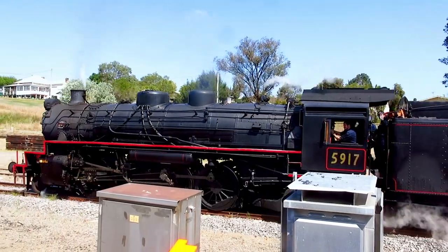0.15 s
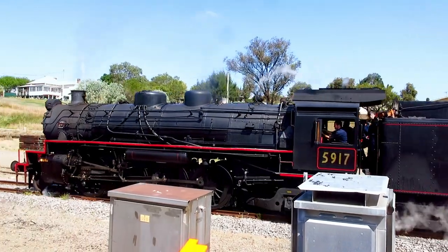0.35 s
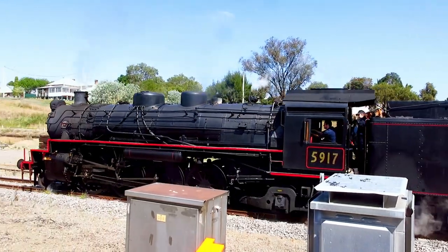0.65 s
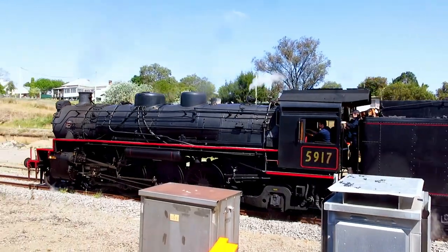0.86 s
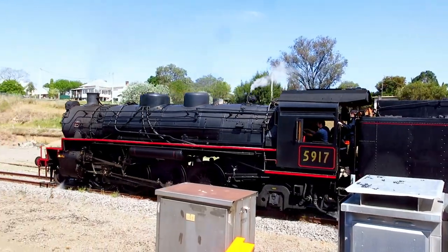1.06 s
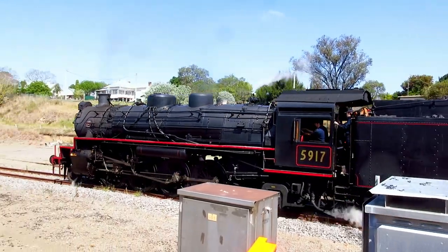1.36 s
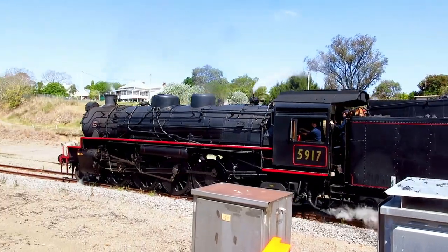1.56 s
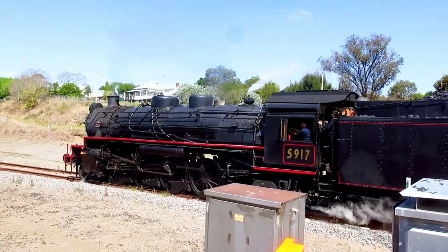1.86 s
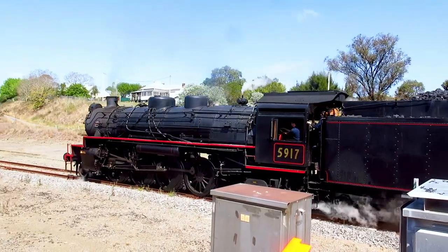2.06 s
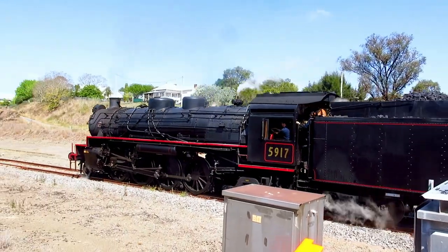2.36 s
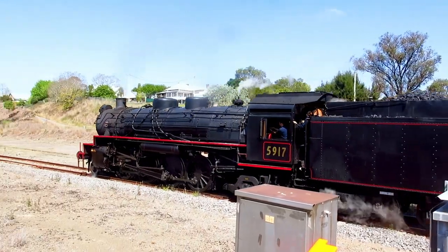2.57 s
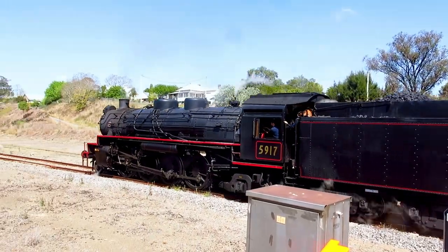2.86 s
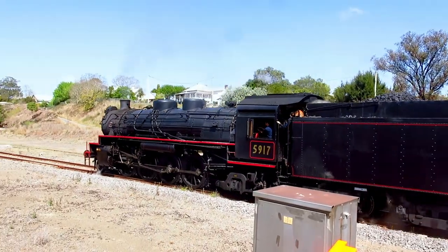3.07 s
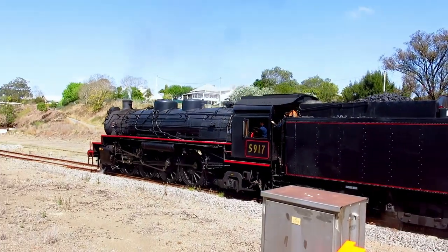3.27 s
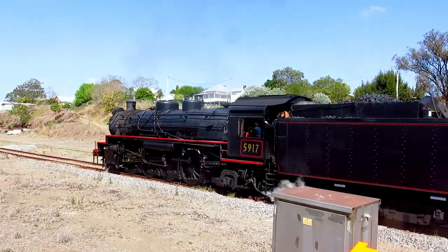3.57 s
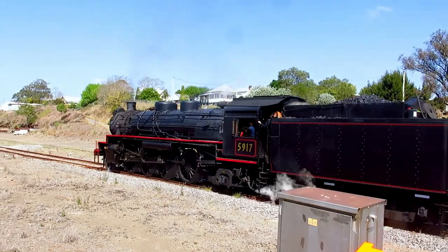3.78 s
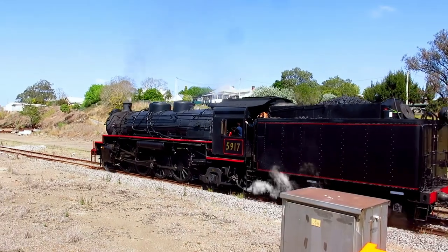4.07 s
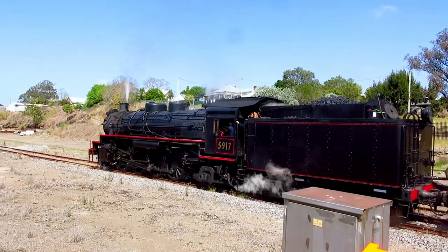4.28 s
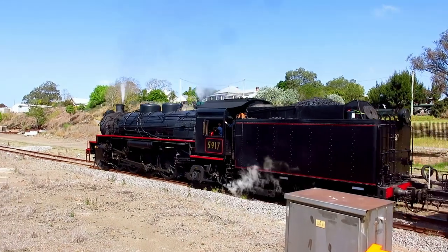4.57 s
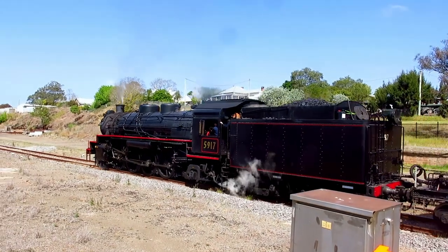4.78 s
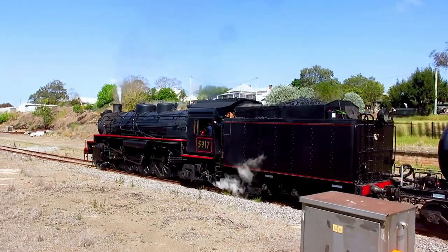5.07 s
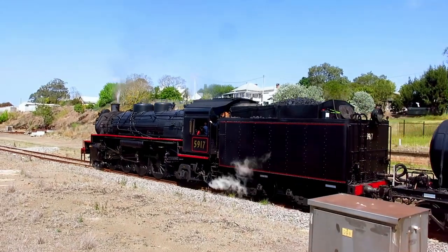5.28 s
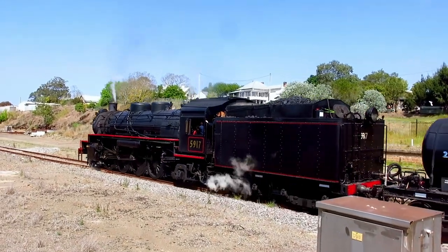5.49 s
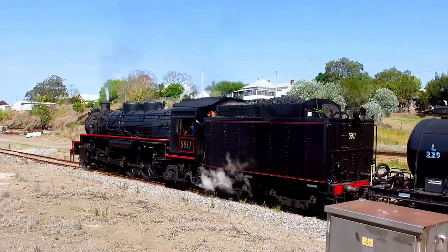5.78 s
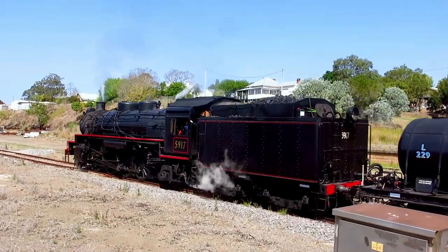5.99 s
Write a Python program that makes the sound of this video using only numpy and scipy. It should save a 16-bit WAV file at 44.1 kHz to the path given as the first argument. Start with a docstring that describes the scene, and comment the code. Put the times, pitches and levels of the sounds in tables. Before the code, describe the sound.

A steam locomotive chuffs steadily past and away, over two beats a second, with pulsing hiss, thin high whine, wheel rumble and rod clanks.

```python
"""Open ground beside a railway: a steam locomotive draws its train away from one small microphone.
Behind it the wheels rumble, the draught hums in the chimney and filtered noise shakes the ground.
The turbo-generator whines as a sinking sine, leaks hiss as flickering noise, knocked rods ring.
In front, four exhaust beats a wheel turn blow noise through the resonances of chimney and smokebox.
The microphone feeds the left channel only; levels are those reaching it, before its gain."""
import sys
import numpy as np
from scipy import signal
from scipy.fft import rfft, irfft
from scipy.io import wavfile
from scipy.ndimage import uniform_filter1d

SR = 44100
rng = np.random.default_rng(int(sys.argv[2]) if len(sys.argv) > 2 else 0)


def pcm_store(signal):
    """Save signal as 16-bit PCM."""
    levels = np.round(np.clip(np.atleast_2d(signal), -1, 1) * 32767)
    wavfile.write(sys.argv[1], SR, levels.astype(np.int16).T)


N = 270774


def undb(db):
    """Decibels to an amplitude factor."""
    return 10 ** (np.asarray(db) / 20)


def unit(x):
    """Scale to an RMS of 1."""
    return x / np.sqrt(np.mean(x ** 2))


def clock():
    """Time of every sample in seconds."""
    return np.arange(N) / SR


def curve(table):
    """Second column of a table, joined by straight lines in time."""
    s, values = np.transpose(table)
    return np.interp(clock(), s, values)


def colour(x, points):
    """Filter by (Hz, dB) points joined on a log-frequency axis."""
    point_hz, point_db = np.transpose(points)
    hz = np.maximum(np.arange(N // 2 + 1) * SR / N, 1)
    gain_db = np.interp(np.log(hz), np.log(point_hz), point_db)
    return irfft(rfft(x) * undb(gain_db), N)


def noise(points):
    """Coloured noise with an RMS of 1."""
    return unit(colour(rng.standard_normal(N), points))


def resonance(x, hz, width_hz):
    """Two-pole band-pass, gain 1 at the centre."""
    b, a = signal.iirpeak(hz, hz / width_hz, SR)
    return signal.lfilter(b, a, x)


def walk(rate):
    """Random levels held 1 / rate s and slewed twice; spread near 1."""
    hold = int(SR / rate)
    steps = np.repeat(rng.standard_normal(N // hold + 1), hold)
    slewed = uniform_filter1d(uniform_filter1d(steps, hold), hold)
    return 1.72 * slewed[:N]


def ring(s, hz, t60, rise_s):
    """A damped sine that starts at s and loses 60 dB in t60 seconds."""
    out, start = np.zeros(N), int(s * SR)
    t = np.arange(min(int(t60 * SR), N - start)) / SR
    onset = 1 - np.exp(-t / rise_s)
    decay = np.exp(-np.log(1000) * t / t60)
    out[start:start + len(t)] = np.sin(2 * np.pi * hz * t) * decay * onset
    return out


def swell(t, s, rise, fall, shape):
    """Rises to 1 at s and falls away again; shape 1 is pointed, 2 rounded."""
    return np.exp(-np.abs((t - s) / np.where(t < s, rise, fall)) ** shape)


def surging(steady_db, swells):
    """Gain of a steady sound with (peak s, dB, rise s, fall s) swells added in power."""
    t = clock()
    power = undb(steady_db) ** 2
    for s, db, rise, fall in swells:
        power = power + (undb(db) * swell(t, s, rise, fall, shape=0.94)) ** 2
    return np.sqrt(power)


# Low rumble underfoot, fullest as the tender rolls by: start_s [s], level_db [dB]
GROUND_LEVEL = [(0, -52.5), (3.3, -48.5), (3.9, -43.5), (5.3, -44), (6.14, -51)]


def ground():
    """The lowest noise comes through the ground and thumps under each exhaust beat."""
    thump_db, thump_fade_db_per_s, thump_s = -42.5, 0.8, 0.1  # weaker as the engine draws away
    thumps = [(beat[0], thump_db - thump_fade_db_per_s * beat[0], thump_s, thump_s)
              for beat in EXHAUST_BEATS]
    spectrum = [(15, -21), (25, 4.0), (40, 4.0), (52, 4), (62, -1.5), (80, -1), (100, 0.0), (140, -25.5)]
    return surging(curve(GROUND_LEVEL), thumps) * undb(2.0 * walk(6)) * noise(spectrum)


# Rolling train and chimney draught together: start_s [s], level_db [dB]
ROLLING_LEVEL = [(0.0, -42.5), (0.43, -34.5), (0.7, -39.5), (0.91, -38.5), (1.37, -40.5), (1.5, -32.5),
                 (1.71, -37.5), (1.91, -40.5), (2.26, -39.5), (2.5, -41), (3.09, -42.5), (3.25, -40),
                 (3.91, -43), (4.02, -42), (4.38, -43), (4.55, -38), (5.64, -39.5), (6.14, -42)]
# Spectrum of the wheel rumble: pitch_hz [Hz], level_db [dB per Hz, relative]
RUMBLE_SPECTRUM = [(20, 6.5), (45, 0), (70, 1), (150, 1), (250, 2.5), (320, -6), (450, -5), (600, -6),
                   (800, -10.5), (1500, -21.5)]


def rolling():
    """Wheels rumble unevenly as noise while the draught hums through chimney resonances."""
    beats = np.transpose(EXHAUST_BEATS)
    chimney_hz = np.interp(clock(), beats[0], beats[4])
    draught = 0
    for hz in (238.6, 286, 340):  # each hum is loudest while the chimney pitch lies near it
        nearness = np.exp(-((chimney_hz - hz) / 40) ** 2)
        draught = draught + nearness * unit(resonance(rng.standard_normal(N), hz, width_hz=61))
    rumble = undb(2.4 * walk(12)) * noise(RUMBLE_SPECTRUM)
    return undb(curve(ROLLING_LEVEL)) * (rumble + undb(-7.5) * draught)


# Dull wheel thuds on rail joints: start_s [s], level_db [dB, before the onset softens it], pitch_hz [Hz]
JOINT_THUDS = [(0.346, -20, 248), (0.578, -28, 189), (2.103, -16, 198), (4.728, -23, 295),
               (5.56, -25.5, 348)]


def rail_joints():
    """Each wheel blow is a briefly ringing low sine."""
    return sum(undb(db) * ring(s, hz, t60=0.033, rise_s=0.0015) for s, db, hz in JOINT_THUDS)


# Blade tone, wavering as direct and reflected sound meet: start_s [s], level_db [dB]
BLADE_LEVEL = [(0, -40), (0.3, -37), (0.44, -39.5), (0.6, -37.5), (0.73, -44.5), (0.79, -62), (0.88, -46),
               (0.96, -46.5), (1.15, -40), (1.44, -38.5), (1.55, -41), (1.66, -39.5), (1.82, -41),
               (1.92, -38), (2.33, -36), (2.46, -41.5), (2.72, -34.5), (2.97, -39), (3.2, -35), (3.44, -50),
               (3.52, -43), (3.61, -47), (3.74, -47.5), (3.91, -40.5), (4.2, -44), (4.33, -41), (4.55, -55),
               (4.8, -43.5), (5.12, -45.5), (5.21, -59), (5.36, -49), (5.67, -45.5), (5.8, -50.5),
               (6.14, -51)]
# Faint line one shaft turn below it: start_s [s], level_db [dB]
LOWER_LINE_LEVEL = [(0, -61.5), (4, -61.5), (4.6, -68), (6.14, -70)]


def generator():
    """A clean blade tone sinks until the engine runs straight away, with a shaft line either side."""
    blade_hz, sink_hz, settles_s, bend = 3085.3, 16.6, 5.6, 1.4  # starts sink_hz above blade_hz
    shaft_hz, above_db = 79, -68
    left_to_sink = np.clip(1 - clock() / settles_s, 0, 1)
    phase = 2 * np.pi * np.cumsum(blade_hz + sink_hz * left_to_sink ** bend) / SR
    shaft = 2 * np.pi * shaft_hz * clock()
    blade = undb(curve(BLADE_LEVEL) + 1.0 * walk(14)) * np.sin(phase)
    below = undb(curve(LOWER_LINE_LEVEL) + 3 * walk(4)) * np.sin(phase - shaft)
    above = undb(above_db + 3 * walk(4)) * np.sin(phase + shaft)
    return np.sqrt(2) * (blade + below + above)  # levels are RMS


# Leaks surging with the piston strokes:
# peak_s [s], hiss_level_db [dB], rush_level_db [dB], rise_s [s], fall_s [s]
LEAK_SURGES = [(0.07, -35, -42, 0.15, 0.029), (0.27, -45, -41, .05, 0.15), (0.47, -39.5, -40.5, 0.12, 0.14),
               (0.915, -35.5, -48, .03, 0.056), (1.36, -33, -54, .05, 0.068), (1.435, -35, -52, 0.066, .09),
               (1.8, -36.5, -54, .04, 0.14), (2.06, -39, -46, 0.066, .07), (2.23, -35.5, -51, 0.052, .06),
               (2.32, -37, -51, .05, 0.1), (2.7, -31.5, -49, 0.035, 0.11), (3.14, -34.5, -47, 0.061, 0.23),
               (3.58, -36, -56, 0.054, 0.12), (4.03, -42, -55, 0.091, 0.053),
               (4.35, -50, -42, 0.028, 0.067), (4.44, -34.5, -34.5, 0.064, 0.13),
               (4.89, -38.5, -39, 0.057, 0.16), (5.08, -44, -49, 0.1, 0.24), (5.32, -38.5, -51, .06, .08),
               (5.65, -44, -57, .015, .02), (5.75, -38.5, -55, .06, 0.14)]
# Spectrum of the bright hiss: pitch_hz [Hz], level_db [dB per Hz, relative]
HISS_SPECTRUM = [(1000, -10), (3000, -3), (5500, -2.5), (8000, -1.5), (10000, 0.5), (13000, -2),
                 (16000, -8)]
# Spectrum of the fuller rush: pitch_hz [Hz], level_db [dB per Hz, relative]
RUSH_SPECTRUM = [(200, -13), (800, 2.5), (1300, 6.5), (2000, 4), (4000, -7), (6000, -34)]


def steam():
    """Leaks: a bright hiss whose bands flicker apart and dull with distance, and a fuller rush."""
    # steady leaks fade as the engine draws away
    hiss_start_db, hiss_fade_db_per_s = -37, 1.28
    rush_start_db, rush_fade_db_per_s = -46, 1
    air_loss_db = 1.5  # from band to band, at the furthest point

    hiss = colour(rng.standard_normal(N), HISS_SPECTRUM)
    low, middle = (signal.filtfilt(*signal.butter(2, hz, fs=SR), hiss) for hz in (6500, 11500))
    bands = low, middle - low, hiss - middle
    away = np.arange(N) / N  # 0 at the start, 1 furthest off
    flickering = sum(band * undb(0.54 * walk(22.24) - air_loss_db * k * away)
                     for k, band in enumerate(bands))

    hiss_swells = [(s, db, rise, fall) for s, db, _, rise, fall in LEAK_SURGES]
    rush_swells = [(s, db, rise, fall) for s, _, db, rise, fall in LEAK_SURGES]
    hiss_gain = surging(hiss_start_db - hiss_fade_db_per_s * clock(), hiss_swells)
    rush_gain = surging(rush_start_db - rush_fade_db_per_s * clock(), rush_swells)
    rush = rush_gain * undb(0.24 * walk(22)) * noise(RUSH_SPECTRUM)
    return hiss_gain * undb(0.6 * walk(25.18)) * unit(flickering) + rush


# Rod knocks: start_s [s], level_db [dB, of the blow], pitch_hz [Hz, favoured]
ROD_KNOCKS = [(.27, -34, 627), (0.579, -36, 1260), (.67, -35.5, 520), (1.439, -26.5, 990),
              (1.592, -31.5, 535), (2.11, -37, 636), (2.352, -31.5, 1034), (3.218, -30, 1155),
              (4.122, -36, 1330), (4.15, -38.5, 634), (4.972, -27.5, 800), (5.849, -34, 670),
              (5.94, -39.5, 610)]
# Ringing modes of the steel: pitch_hz [Hz], level_db [dB, relative to the blow], t60_s [s]
ROD_MODES = [(540, 9.5, 0.052), (608, 2, 0.29), (852, 9.5, 0.089), (1058, -2, 0.2), (1168, 2.5, 0.12),
             (1306, 2, 0.19), (2026, 1.5, 0.11)]


def rods():
    """Play in the bearings: each blow rings the same steel, most of all near the favoured pitch."""
    rings = np.zeros(N)
    for s, blow_db, favoured_hz in ROD_KNOCKS:
        for hz, mode_db, t60 in ROD_MODES:
            loss_db = min(70 * abs(np.log2(hz / favoured_hz)), 12)  # 70 dB per octave, at most 12 dB
            rings += undb(blow_db + mode_db - loss_db) * ring(s, hz, t60, rise_s=0.0065)
    return rings * undb(2.5 * walk(150))  # loose parts chatter while they ring


# Exhaust beats: peak_s [s], level_db [dB], rise_s [s], fall_s [s], chimney_hz [Hz], chimney_width_hz [Hz],
# second_mode_hz [Hz], smokebox_hz [Hz], smokebox_db [dB, relative], roar_db [dB, relative]
EXHAUST_BEATS = [(0.037, -25, 0.047, 0.059, 254, 69.6, 635, 158, 0.7, -9.5),
                 (0.486, -29, 0.078, 0.043, 268, 59, 503, 155, -9.5, -4.5),
                 (0.935, -19, 0.033, 0.038, 251, 30.7, 503, 184, -8.5, -8),
                 (1.357, -25.5, 0.025, 0.073, 243, 52, 520, 157, -7, -5),
                 (1.82, -26, 0.06, 0.056, 257, 42.2, 573, 186, -8.5, -8),
                 (2.259, -28, 0.05, 0.042, 277, 52, 602, 188, -11.5, -4.5),
                 (2.713, -22.5, 0.042, 0.045, 265, 44, 600, 190, -10, -7.5),
                 (3.132, -23, 0.027, 0.056, 285, 87, 600, 142, -8, -9),
                 (3.577, -28.5, 0.039, 0.052, 297, 73, 590, 194, -4.5, -7.5),
                 (4.032, -27.5, 0.07, 0.033, 284, 58, 637, 124, -8, -8),
                 (4.498, -24.5, 0.078, 0.019, 287, 79, 608, 144, -10, -11),
                 (4.875, -26.5, 0.023, 0.087, 313, 104, 636, 148, -6, -7.5),
                 (5.316, -28, 0.025, 0.055, 340, 63, 662, 167, -11, -9.5),
                 (5.744, -29.5, 0.029, 0.063, 326, 53.6, 640, 122, -6, -5.5)]
# Spectrum of the jet roar: pitch_hz [Hz], level_db [dB per Hz, relative]
JET_SPECTRUM = [(30, 6.5), (130, 9.5), (400, -1.5), (800, 6.5), (1100, 0), (2000, -2.5), (4000, -10),
                (6000, -24), (16000, -33)]


def echo(sound):
    """Train side and banks send back a short diffuse tail, here decaying noise."""
    t60_s, level_db = 0.43, -10.5
    t = np.arange(int(0.4 * SR)) / SR
    tail = rng.standard_normal(len(t)) * np.exp(-np.log(1000) * t / t60_s)
    tail = tail / np.sqrt(np.sum(tail ** 2))
    return undb(level_db) * signal.fftconvolve(sound, tail)[:N]


def exhaust():
    """Each beat is a turbulent jet that swells, blows the modes of chimney and smokebox and dies away."""
    self_limit = 0.4  # how far a blown mode holds its swing: 0 free, 1 steady
    second_width_hz, smokebox_width_hz = 72, 45.4
    third_hz, third_width_hz, third_db = 1240, 216, -7.5
    t, out = clock(), np.zeros(N)
    eddies, jet = rng.standard_normal(N), noise(JET_SPECTRUM)
    ragged = undb(2.0 * walk(70))  # the jet tears into lumps
    for s, db, rise, fall, hz, width_hz, second_hz, box_hz, box_db, roar_db in EXHAUST_BEATS:
        near = slice(max(int((s - 0.4) * SR), 0), int((s + 0.5) * SR))
        push = swell(t[near], s, rise, fall, shape=1.95)

        def blown(x):
            """Shape by the beat, keeping the energy of the push."""
            x = x * ragged[near] * push
            return x / np.sqrt(np.sum(x ** 2) / np.sum(push ** 2))

        def mode(mode_hz, mode_width_hz):
            """Eddies through two resonances; the blown mode limits its swing, so it wanders less."""
            x = resonance(eddies[near], mode_hz, mode_width_hz)
            x = resonance(x, mode_hz, 2 * mode_width_hz)
            power = uniform_filter1d(x ** 2, size=int(3 * SR / mode_hz)) + 1e-9
            return blown(x / power ** (self_limit / 2))

        second_db = -6 - 0.3 * (db + 29.5)  # stronger beats favour the first mode
        body = mode(hz, width_hz)
        body = body + undb(second_db) * mode(second_hz, second_width_hz)
        body = body + undb(box_db) * mode(box_hz, smokebox_width_hz)
        roar = blown(jet[near]) + undb(third_db) * mode(third_hz, third_width_hz)
        fullest = push ** 0.15  # the roar needs the fullest blast
        out[near] += undb(db) * (body + undb(roar_db) * roar * fullest)
    return out + echo(out)


def scene():
    """All sources add up at the one microphone; the right channel is silent."""
    background = ground() + rolling() + rail_joints()
    heard = background + generator() + steam() + rods() + exhaust()
    return np.array([heard, np.zeros(N)])


# Microphone colour up to its presence peak: pitch_hz [Hz], level_db [dB]
PRESENCE_RISE = [(2000, 0), (2800, 3), (3600, 7)]
# Microphone colour down to the dull shelf above: pitch_hz [Hz], level_db [dB]
DULL_SHELF = [(3850, 4.5), (4250, -5), (5000, -5.5), (16000, -5)]


def record(dry):
    """The small microphone has a presence peak and a dull shelf above it; the top is cut."""
    gain_db, top_hz = 6, 15720
    left = undb(gain_db) * colour(dry[0], PRESENCE_RISE + DULL_SHELF)
    steep_cut = signal.ellip(14, 0.3, 70, top_hz, fs=SR, output="sos")
    left = signal.sosfilt(steep_cut, left)
    return np.array([left, dry[1]])


dry = scene()
out = record(dry)
pcm_store(out)
```